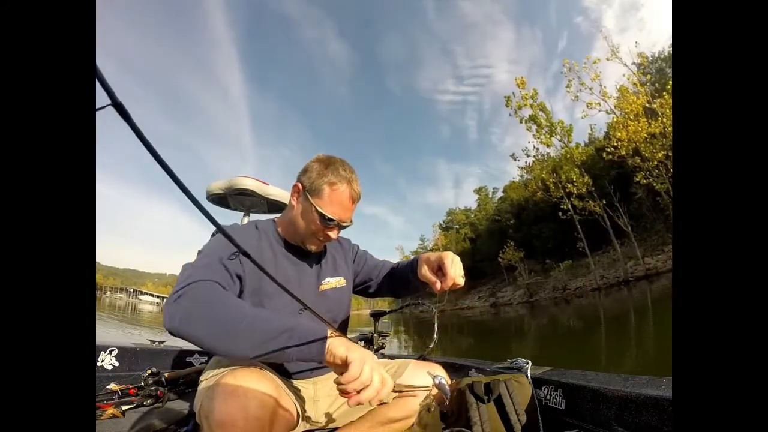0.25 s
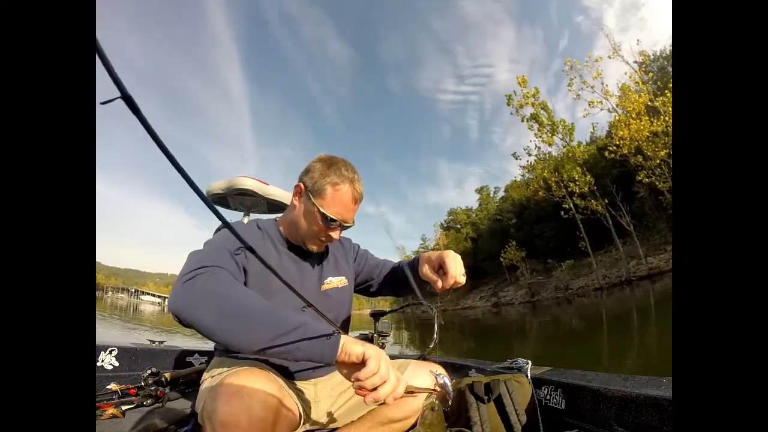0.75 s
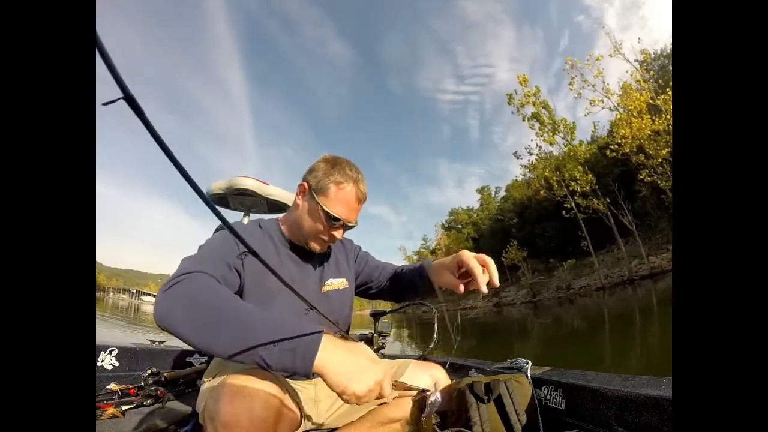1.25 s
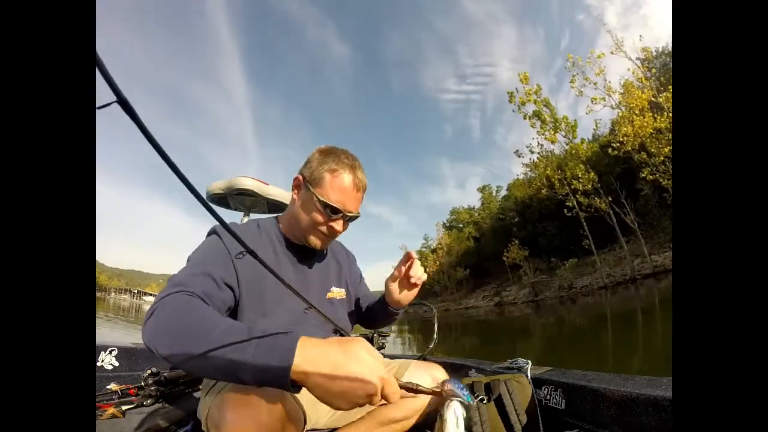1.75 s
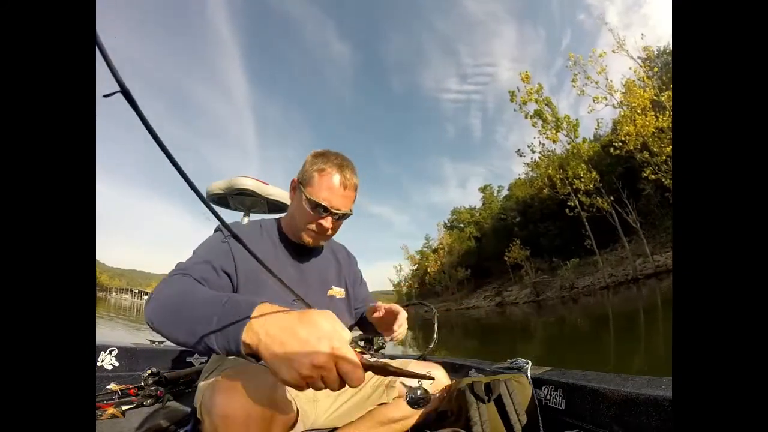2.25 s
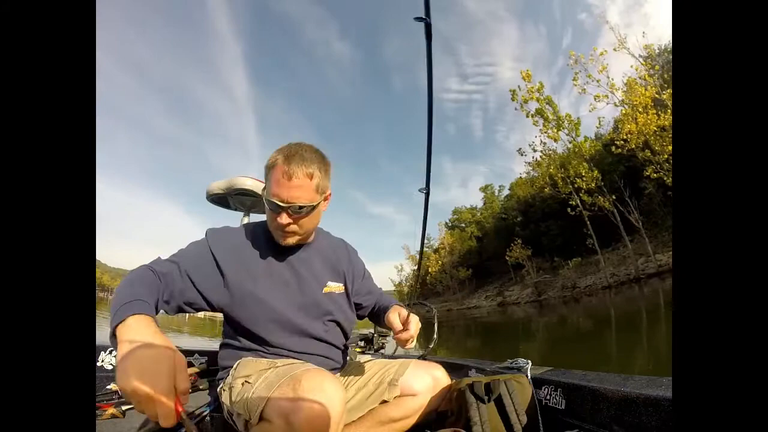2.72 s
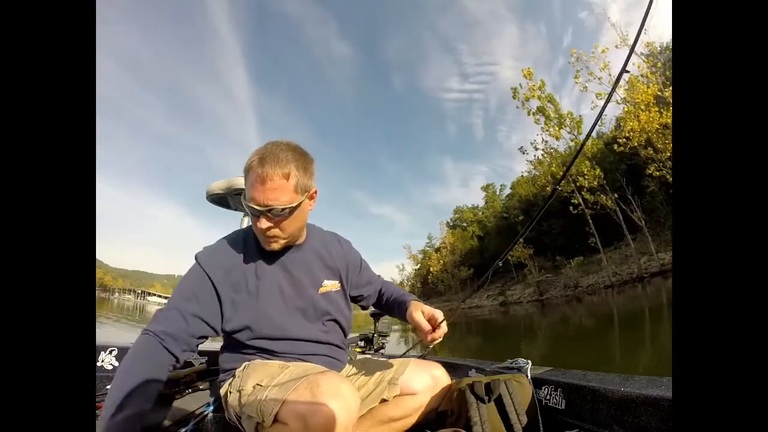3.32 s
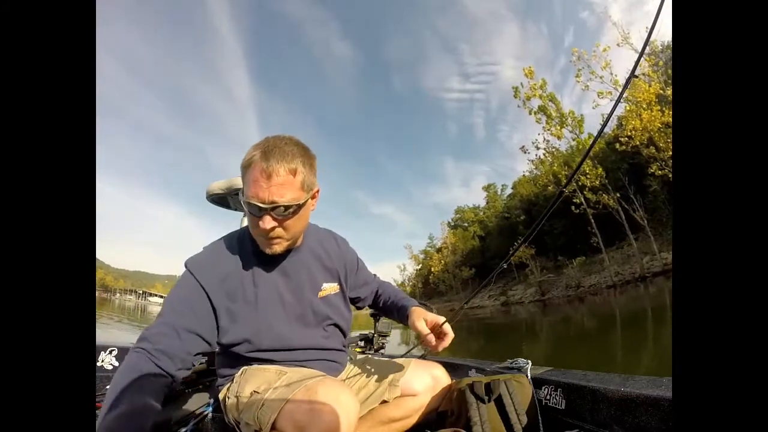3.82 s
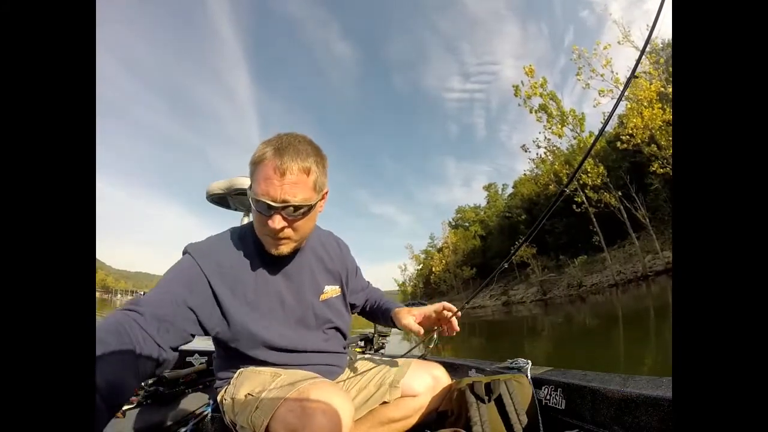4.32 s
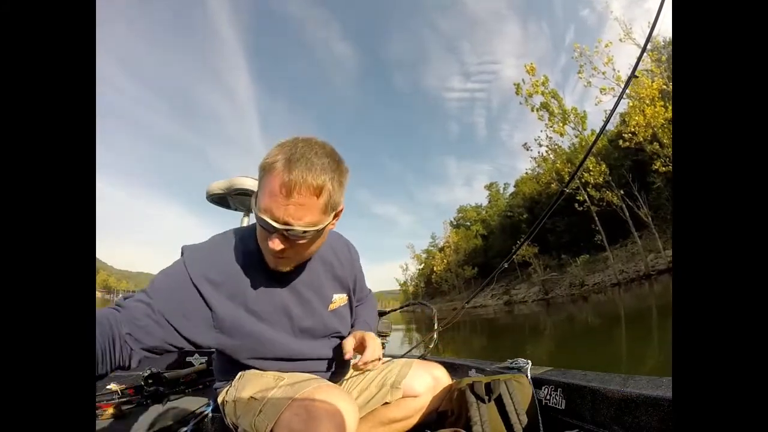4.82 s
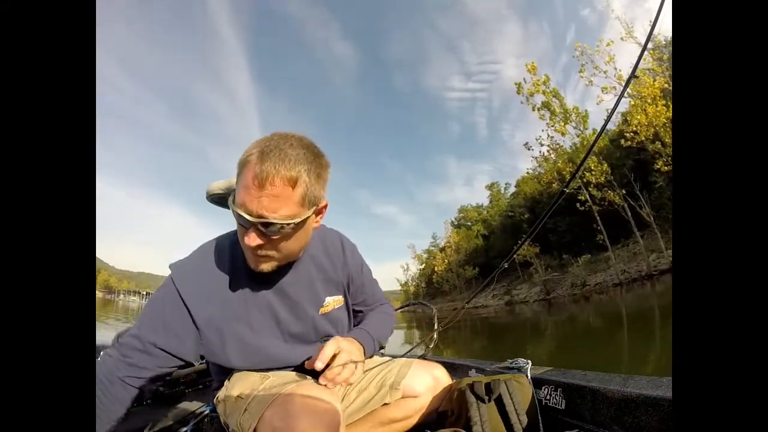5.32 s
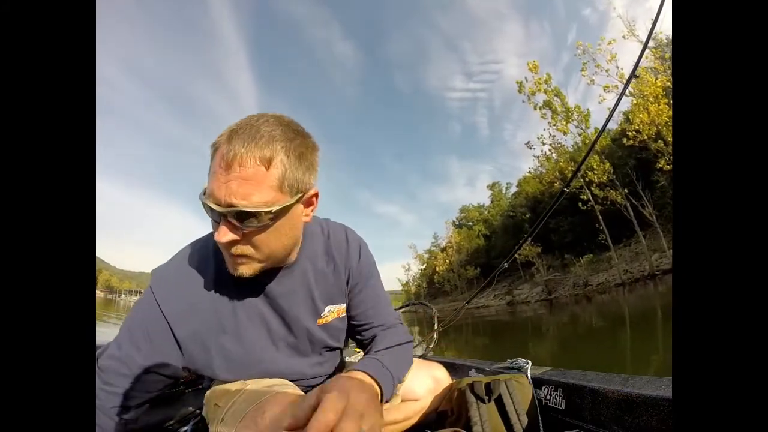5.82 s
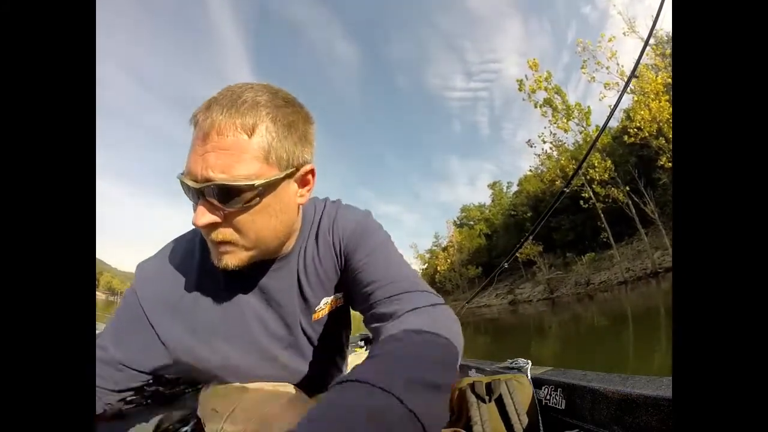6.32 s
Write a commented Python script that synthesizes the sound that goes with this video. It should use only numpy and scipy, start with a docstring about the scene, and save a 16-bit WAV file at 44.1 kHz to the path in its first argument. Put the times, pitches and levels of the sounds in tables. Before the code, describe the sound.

Irregular metal clinks, plastic clacks and hollow knocks as a hooked fish thrashes in a small boat on a quiet lake.

```python
"""Light wind and lake hush lie around a small swaying boat, where tackle ticks faintly. From 1.4 s a
hooked fish thrashes, rattling the lure's hooks and plastic body. Near 2.8 s steel pliers are dropped
among the tackle and jangle. Fish and gear thump the hollow deck, hardest at 4.7 s.
From 5.1 s a far bird whistles, before and after one last flurry."""
import sys
import numpy as np
from scipy import signal
from scipy.fft import rfft, irfft
from scipy.io import wavfile

SR = 44100
rng = np.random.default_rng(int(sys.argv[2]) if len(sys.argv) > 2 else 0)


def to_wav(sig):
    """Store sig (one row per channel, or 1-D mono) as 16-bit WAV at the path in sys.argv[1].

    Samples outside -1..1 are clipped; the rate is SR.
    """
    pcm = np.clip(np.atleast_2d(sig), -1, 1) * 32767
    pcm = np.round(pcm).astype(np.int16)
    wavfile.write(sys.argv[1], SR, pcm.T)  # frames by channels


N = 289560


def from_db(db):
    return 10 ** (np.asarray(db) / 20)


def rms_one(x):
    return x / np.sqrt(np.mean(x ** 2) + 1e-20)


def curves(rows):
    """Draws one automation curve for each column after the time."""
    times, *columns = np.transpose(rows)
    return [np.interp(np.arange(N) / SR, times, column) for column in columns]


def equalise(x, spectrum):
    """Shapes x with an EQ curve of (frequency [Hz], gain [dB]) points."""
    hz, db = np.transpose(spectrum)
    grid = np.maximum(np.arange(len(x) // 2 + 1) * SR / len(x), 1)
    return irfft(rfft(x) * from_db(np.interp(np.log(grid), np.log(hz), db)), len(x))


def drift(rate_hz):
    """Smooth random modulation at unit RMS."""
    pole = np.exp(-2 * np.pi * rate_hz / SR)
    return rms_one(signal.lfilter([1], [1, -2 * pole, pole * pole], rng.standard_normal(N + SR))[SR:])


def ring(force, hz, t60):
    """One mode: a unit click sets off a dying sine of height 1."""
    r, w = from_db(-60 / (t60 * SR)), 2 * np.pi * hz / SR
    return signal.lfilter([0, np.sin(w)], [1, -2 * r * np.cos(w), r * r], force + 1e-18)


def grains(per_s, spread_db):
    """Random tiny contacts of uneven size, at unit RMS."""
    when, size, sign = rng.random((round(per_s * N / SR), 3)).T
    size_db = spread_db * np.minimum(-np.log(1 - size), 4)
    out = np.zeros(N)
    out[(when * N).astype(int)] = from_db(size_db) * np.sign(sign - .5)
    return rms_one(out)


def add_hit(track, time, sound, peak_db):
    """Lays a one-shot on the track at the given peak level."""
    i = round(time * SR)
    track[i:i + len(sound)] += (from_db(peak_db) * sound / np.abs(sound).max())[:N - i]


# Tone of the lake bed: (frequency [Hz], relative level [dB])
LAKE_EQ = [(12, -35), (20, -18.5), (60, -1), (86, -0.5), (590, -10.5), (976, -14), (1150, -16.5),
           (1910, -23.5), (5530, -27.5), (13500, -41), (14900, -47), (16000, -67)]


def lake_hush(level_db=-55.5):
    """The lake is a steady bed of dark noise."""
    return from_db(level_db) * rms_one(equalise(rng.standard_normal(N), LAKE_EQ))


# Low swells of rumble as the hull sways: (time [s], level [dB])
HULL_SWAYS = [(1.55, -46.5), (2.23, -36), (2.43, -44), (3.1, -44.5), (3.69, -45), (4.19, -46), (4.4, -42.5),
              (4.73, -27), (5.01, -37), (5.85, -37), (6.21, -45)]


def hull_sway(rise_s=0.014, t60=0.53):
    """Envelope of the swaying hull: each sway rises and dies away, and overlaps add in power."""
    times, db = np.transpose(HULL_SWAYS)
    power = np.full(N, 1e-18)
    np.add.at(power, (times * SR).astype(int), from_db(2 * db))
    rise, fall = np.exp(-1 / (rise_s * SR)), from_db(-2 * 60 / (t60 * SR))
    return np.sqrt(signal.lfilter([1 - rise], np.poly([rise, fall]), power))


# Fader ride of the wind on the microphone: (time [s], level [dB])
WIND_RIDE = [(0, -56.5), (1.5, -58.5), (3.0, -55), (4.1, -54.5), (4.5, -51.5), (5.3, -60.5), (5.75, -50),
             (6.57, -58.5)]


def wind_and_hull():
    """Air over the microphone and the swaying hull share one lumpy low rumble."""
    band = signal.butter(2, [40, 130], "band", fs=SR, output="sos")
    rumble = signal.sosfilt(band, rng.standard_normal(N)) * from_db(2.9 * drift(3.5))
    return np.hypot(from_db(curves(WIND_RIDE)[0]), hull_sway()) * rms_one(rumble)


def whistle(contour, octave_db):
    """One bird note: a wavering sine and its octave, with soft ends."""
    hz, level_db = curves(contour)
    t = np.arange(N) / SR
    phase = 2 * np.pi * np.cumsum(hz * (1 + .004 * drift(42))) / SR
    gate = np.clip(np.minimum(t - contour[0][0], contour[-1][0] - t) / 0.017, 0, 1)
    tone = np.sin(phase) + from_db(octave_db) * np.sin(2 * phase)
    return np.sqrt(2) * gate * from_db(level_db + 3.4 * drift(36.8)) * tone


# Contour of the arching whistle: (time [s], pitch [Hz], level [dB])
ARCHING_CALL = [(6.04, 5500, -73), (6.09, 6000, -72), (6.15, 6010, -68), (6.19, 5830, -71),
                (6.25, 5600, -68), (6.305, 4600, -72)]
# Calls on one pitch: (time [s], length [s], pitch [Hz], crest level [dB])
FLAT_CALLS = [(5.15, .11, 3890, -70), (5.345, 0.026, 3820, -64), (6.42, .13, 4050, -74)]


def far_bird(crest_share=.35, fade_db=19):
    """A far bird gives one almost pure arching whistle and short flat calls that crest early."""
    out = whistle(ARCHING_CALL, octave_db=-40)
    for time, length, hz, db in FLAT_CALLS:
        crest, end = time + crest_share * length, time + length
        out += whistle([(time, hz, db - fade_db), (crest, hz, db), (end, hz, db - fade_db)], octave_db=-12)
    return out


# Faint stirring of the gear, resting floor included: (time [s], metal [dB], plastic [dB], deck [dB])
STIRRING = [(0, -67, -63, -60), (1.4, -67, -62, -57.5), (1.7, -52, -53.5, -52.5), (2.15, -50, -47.5, -47),
            (2.3, -64, -61.5, -56.5), (2.7, -57, -56, -50.5), (3.1, -66, -57.5, -49.5),
            (3.6, -67.5, -62, -59.5), (4.15, -70, -61.5, -55), (4.55, -64.5, -60.5, -51),
            (4.95, -68, -61, -48), (5.1, -70, -61, -55.5), (6.57, -69, -60, -62)]
# Bouts of shaking, sliding and tumbling:
# (start [s], end [s], metal [dB], plastic [dB], deck [dB], change by the end [dB])
THRASH_BOUTS = [(1.371, 1.42, -53.5, -60, -55, -5), (1.55, 1.588, -46, -45, -38.5, 6),
                (1.595, 1.614, -35, -52, -43, -10), (1.708, 1.791, -44, -47.5, -47, 1),
                (1.794, 1.845, -34, -34.5, -36.5, -7), (1.86, 1.96, -44, -55, -60, 3.5),
                (1.984, 2.12, -36, -46, -40.5, -8.5), (2.14, 2.198, -59, -57, -61, 11),
                (2.227, 2.287, -59, -38, -25, -10), (2.293, 2.482, -66.5, -58, -44.5, 1),
                (2.539, 2.605, -49.5, -73, -72, -7), (2.638, 2.703, -63, -49, -47, -10),
                (2.755, 2.788, -22.5, -26.5, -21, -8.5), (2.805, 2.889, -31.5, -28, -30.5, -18.5),
                (2.887, 2.945, -34.5, -26, -32, -10), (2.954, 3.062, -64, -56, -50.5, 5),
                (3.207, 3.221, -36, -41, -41, -5), (3.269, 3.298, -44.5, -50, -62, -5),
                (3.402, 3.498, -34, -44, -40, -17.5), (3.509, 3.61, -73, -65.5, -64.5, 11.5),
                (3.675, 3.795, -35, -41.5, -35.5, -18.5), (3.812, 3.9, -49, -59, -43, -16.5),
                (4.182, 4.232, -80, -63.5, -41, 3), (4.268, 4.291, -64, -48, -20.5, -31),
                (4.383, 4.495, -79, -67, -35.5, 6), (4.444, 4.53, -53, -65, -40.5, -7),
                (4.558, 4.644, -63.5, -54, -43, 10.5), (4.65, 4.69, -48.5, -45, -26.5, -1),
                (4.702, 4.721, -43, -33, -16.5, -16), (4.72, 4.864, -45.5, -39.5, -22.5, -16),
                (4.907, 4.929, -58.5, -49.5, -34, -3.5), (5.008, 5.064, -59, -62, -29.5, -33),
                (5.329, 5.389, -72, -58.5, -42.5, -2.5), (5.412, 5.47, -64, -46, -46.5, -3),
                (5.539, 5.609, -52, -31, -33.5, -19.5), (5.817, 5.85, -59, -58, -44.5, -1.5),
                (5.848, 5.886, -35, -41.5, -25.5, -8), (5.87, 6.023, -48, -64, -47.5, -14.5),
                (5.946, 5.994, -39, -34, -21, -35), (6.188, 6.224, -64.5, -52, -41.5, 0.5),
                (6.54, 6.6, -71, -50.5, -47, 7)]


def gear_motion(floors_db=(-67, -63, -59), attack_s=0.0083, release_s=0.014):
    """Envelopes of metal, plastic and deck: stirring above the floor and sudden bouts add in power."""
    t = np.arange(N) / SR
    power = np.maximum(from_db(curves(STIRRING)) ** 2 - from_db(floors_db)[:, None] ** 2, 0)
    for start, end, *levels_db, change_db in THRASH_BOUTS:
        gate = np.interp(t, [start, start + attack_s, end, end + release_s], [0, 1, 1, 0])
        ramp = from_db(change_db * np.clip((t - start) / (end - start), 0, 1))
        power += (from_db(levels_db)[:, None] * gate * ramp) ** 2
    return np.sqrt(power)


def jingle(modes, per_s, gain):
    """Small contacts feed metal modes whose ring outlasts the motion."""
    energy = sum(from_db(2 * db) * t60 * SR / (4 * np.log(1000)) for hz, db, t60 in modes)
    rings = sum(from_db(db) * ring(gain * grains(per_s, spread_db=5), hz, t60) for hz, db, t60 in modes)
    return rings / np.sqrt(energy)


# Ring of the hooks: (frequency [Hz], relative level [dB], decay t60 [s])
HOOK_MODES = [(4490, -5, .018), (5190, -8, .012), (5900, -4, .01), (7750, -2, .013), (8150, -1, .011),
              (9380, -7, .01), (10900, -9, .01), (11500, -7, .01), (13300, -6, .012)]
# Ring of the steel pliers: (frequency [Hz], relative level [dB], decay t60 [s])
PLIER_MODES = [(5250, -7, .02), (5370, -6, .035), (5550, -8, .02), (6585, -4, .05), (8086, -11, .03),
               (10290, -3, .036), (10385, -5, .02), (11380, -6, .018), (11520, -5, .032), (14780, -7, .035)]
# Bright crack of metal on metal: (frequency [Hz], relative level [dB])
CRACK_EQ = [(1500, -11), (4000, -6), (7000, -3.5), (11000, -4.5), (15000, -6)]


def metal_rattle(gain, plier_share):
    """Dense small metal contacts: a crackle with the ring of hooks and pliers."""
    crackle = grains(per_s=7000, spread_db=4.3) * from_db(4 * drift(70))
    cracks = rms_one(equalise(crackle, CRACK_EQ))
    hooks = jingle(HOOK_MODES, per_s=450, gain=gain * (1 - plier_share))
    pliers = jingle(PLIER_MODES, per_s=77, gain=gain * plier_share)
    return gain * cracks + from_db(-1.5) * hooks + from_db(4) * pliers


# Metal one-shots: (time [s], peak before muffling [dB], chatter t60 [s], ring against crack [dB])
CLINK_CUES = [(0.0293, -40.5, 0.03, -28), (0.07, -48, 0.02, 2), (0.082, -49, 0.02, -3),
              (0.181, -53, 0.02, 0), (0.33, -53, 0.02, 0), (0.5885, -48, 0.058, 2), (0.881, -54, 0.02, -10),
              (1.08, -55, 0.02, -10), (1.19, -50, 0.024, -6), (1.282, -47, 0.025, -3),
              (1.379, -46, 0.017, 2), (1.4104, -30.5, 0.039, -28), (1.482, -30, 0.038, -31),
              (1.508, -35, 0.061, -5), (1.559, -41, 0.03, -9), (1.5802, -17.5, 0.028, -15),
              (1.608, -27, 0.03, -12), (1.6568, -33.5, 0.076, -15), (1.6835, -22, 0.014, -9),
              (1.723, -14, 0.019, -11), (1.8043, -36, 0.053, 0), (1.873, -26, 0.025, -27),
              (1.9111, -36, 0.033, -2), (1.93, -22, 0.035, 17), (2.0062, -18, 0.035, -35),
              (2.045, -14, 0.024, -9), (2.0868, -23.5, 0.053, -33), (2.137, -23, 0.012, -10),
              (2.158, -43, 0.024, -1), (2.175, -28.5, 0.025, -5), (2.2262, -31.5, 0.12, -12),
              (2.314, -38, 0.064, 9), (2.3302, -33.5, 0.052, -12), (2.374, -36, 0.025, -14),
              (2.394, -36, 0.025, -12), (2.415, -34.5, 0.021, -21), (2.458, -38, 0.012, -25),
              (2.514, -39, 0.034, -6), (2.548, -32, 0.033, -28), (2.583, -36, 0.062, -11),
              (2.6, -31, 0.031, -5), (2.6437, -21.5, 0.034, -16), (2.676, -31, 0.018, -8),
              (2.6967, -31, 0.092, -2), (2.7385, -24.5, 0.037, -26), (2.7676, -3, 0.014, 6),
              (2.805, -9, 0.011, 0), (2.8464, -19, 0.093, 16), (2.8914, -15, 0.023, -9),
              (2.911, -13, 0.015, -15), (2.97, -29, 0.033, -10), (3.013, -29.5, 0.028, 3),
              (3.1378, -43, 0.027, -13), (3.1763, -36.5, 0.023, -28), (3.215, -24.5, 0.063, 29),
              (3.257, -35, 0.051, -15), (3.2819, -34, 0.015, -9), (3.3985, -21.5, 0.03, -10),
              (3.423, -7, 0.023, 4), (3.5452, -34, 0.045, -8), (3.598, -37, 0.02, -7),
              (3.6287, -42, 0.03, -24), (3.6781, -20.5, 0.03, 1), (3.7294, -20, 0.064, 29),
              (3.8184, -26.5, 0.03, -2), (3.8897, -37, 0.025, -22), (3.999, -46, 0.04, -7.5),
              (4.035, -55, 0.018, -9), (4.217, -34, 0.016, -11), (4.2678, -33, 0.031, -19),
              (4.3884, -43, 0.039, -11), (4.403, -45, 0.02, -8), (4.4502, -27, 0.074, -6),
              (4.493, -34, 0.063, 6), (4.5291, -35, 0.04, -9), (4.6102, -25.5, 0.02, -14),
              (4.6216, -24, 0.033, -13), (4.64, -26, 0.018, -10), (4.678, -24, 0.022, -16),
              (4.6928, -19, 0.047, -31), (4.717, -17.5, 0.025, -31), (4.765, -19.5, 0.0065, -26),
              (4.7922, -21, 0.013, -21), (4.826, -36, 0.016, -7), (4.817, -37, 0.015, -11),
              (4.837, -29, 0.015, -22), (4.849, -35, 0.011, -13), (4.9218, -39, 0.044, -14),
              (5.13, -47.5, 0.06, -24), (5.3, -48, 0.017, -10), (5.388, -37, 0.028, -1),
              (5.409, -22.5, 0.027, -11), (5.545, -23.5, 0.057, 10), (5.586, -38, 0.027, -3),
              (5.664, -39, 0.023, -8), (5.827, -37, 0.031, -20.5), (5.848, -15, 0.046, -17),
              (5.915, -25.5, 0.038, 9), (5.942, -19, 0.017, -6), (6.0023, -45, 0.022, -8.5),
              (6.0946, -41.5, 0.038, -26), (6.2136, -39, 0.018, -7)]


def metal_clinks(plier_share):
    """Each clink is a dying chatter of contacts, heard as a crack and ringing hooks or pliers."""
    out, t = np.zeros(N), np.arange(round(.12 * SR)) / SR
    modes = HOOK_MODES + PLIER_MODES
    noises = rng.standard_normal((len(CLINK_CUES), len(t)))
    scatters_db = 6.5 * np.clip(rng.standard_normal((len(CLINK_CUES), len(modes))), -1, 1)
    attack = 1 - np.exp(-t / 0.0004)
    for (time, peak_db, t60, ring_db), noise, scatter_db in zip(CLINK_CUES, noises, scatters_db):
        chatter = noise * attack * from_db(-60 * t / t60)
        share = plier_share[round(time * SR)]
        weights = [1 - share] * len(HOOK_MODES) + [share] * len(PLIER_MODES)
        rings = sum(weight * from_db(db + offset_db) * ring(chatter, hz, mode_t60)
                    for (hz, db, mode_t60), weight, offset_db in zip(modes, weights, scatter_db))
        crack = rms_one(equalise(chatter, CRACK_EQ))
        add_hit(out, time, crack + from_db(ring_db) * rms_one(rings), peak_db)
    return out


# Crossfade and brightness of the metal: (time [s], pliers against hooks [0-1], top band gain [dB])
METAL_BLEND = [(0, 0, 0), (1.4, 0.15, -4.5), (2.72, 0.1, -7), (2.78, 0.46, -26), (3.1, 1, -12.5),
               (3.95, 1, 0.5), (4.4, 0.7, -7), (4.55, 1, 2), (4.6, 0.14, -20), (5.7, 0.1, -21.5),
               (5.85, 0.63, -4), (6.57, 0.4, -7)]


def hooks_and_pliers(gain, crossover_hz=11500):
    """The metal clinks and rattles while hand and gear muffle its highest treble."""
    plier_share, top_db = curves(METAL_BLEND)
    metal = metal_clinks(plier_share) + metal_rattle(gain, plier_share)
    low, high = (signal.butter(2, crossover_hz, kind, fs=SR, output="sos") for kind in ("low", "high"))
    body = signal.sosfilt(np.vstack([low, low]), metal)
    top = signal.sosfilt(np.vstack([high, high]), metal)
    return body + from_db(top_db) * top


def contact_centre(cues):
    """The place being touched moves from blow to blow, heard as a gliding centre in Hz."""
    return curves(sorted((time, hz) for time, _, hz, _ in cues))[0]


def scuffle(modes, centre_hz, per_s, t60_cycles, octaves):
    """Rubbing and small bumps feed short rings of a body, strongest near the centre frequency."""
    lumps = from_db(2.5 * drift(30))
    weights = [from_db(db - 2.07 * (np.log2(hz / centre_hz) / octaves) ** 2) for hz, db in modes]
    rings = [rms_one(ring(grains(per_s, spread_db=5.03) * lumps, hz, t60_cycles / hz)) for hz, _ in modes]
    return sum(w * r for w, r in zip(weights, rings)) / np.sqrt(sum(w ** 2 for w in weights))


def blows(cues, modes, octaves, roughness, contact_cycles):
    """Each blow wakes the modes near its centre; a scuffed contact keeps feeding them briefly."""
    out, t = np.zeros(N), np.arange(round(.15 * SR)) / SR
    noises = rng.standard_normal((len(cues), len(t)))
    scatters_db = 3.6 * rng.standard_normal((len(cues), len(modes)))
    for (time, peak_db, centre_hz, t60), noise, scatter_db in zip(cues, noises, scatters_db):
        force = roughness * noise * np.exp(-t * centre_hz / contact_cycles) / np.sqrt(SR / centre_hz)
        force[round(.0022 * SR)] += 1   # a sharp click 2 ms into the scuff gives the knock its attack
        soft_contact = signal.butter(1, 5.1 * centre_hz, fs=SR, output="sos")
        force = signal.sosfilt(soft_contact, force)
        body = 0
        for (hz, db), offset_db in zip(modes, scatter_db):
            off_centre_db = -3.6 * (np.log2(hz / centre_hz) / octaves) ** 2
            mode_t60 = max(t60, .008) * (centre_hz / hz) ** 0.6
            body += from_db(db + off_centre_db + offset_db) * ring(force, hz, mode_t60)
        # a small body radiates little far below the struck modes
        low_cut = signal.butter(2, 0.39 * centre_hz, "high", fs=SR, output="sos")
        add_hit(out, time, signal.sosfilt(low_cut, body), peak_db)
    return out


# Resonances of the hard plastic: (frequency [Hz], relative level [dB])
PLASTIC_MODES = [(1330, 1.5), (1645, -0.5), (1851, 3.5), (2230, 1.5), (2570, 0), (2880, -0.5), (3032, 1.5),
                 (3280, -3.5), (3880, -5)]
# Plastic one-shots: (time [s], peak [dB], centre of the struck modes [Hz], decay t60 [s])
CLACK_CUES = [(0.5873, -36, 3170, 0.017), (1.2835, -39.5, 3060, 0.011), (1.4064, -36, 1840, 0.016),
              (1.561, -24.5, 1640, 0.046), (1.5772, -23, 2360, 0.012), (1.6045, -22.5, 2390, 0.0091),
              (1.6825, -24, 3400, 0.024), (1.724, -14, 2980, 0.029), (1.803, -24, 3020, 0.048),
              (1.8834, -29.5, 2290, 0.022), (2.0042, -21, 2200, 0.018), (2.0318, -22.5, 1300, 0.0068),
              (2.106, -22, 2780, 0.0077), (2.2348, -18.5, 1250, 0.0061), (2.3394, -32.5, 2770, 0.018),
              (2.5227, -31.5, 2740, 0.022), (2.6459, -17, 3400, 0.034), (2.7008, -29.5, 2150, 0.026),
              (2.7585, -12.5, 1836, 0.033), (2.7691, -2.5, 2920, 0.022), (2.7696, -2.5, 1700, 0.014),
              (2.805, -13, 1780, 0.047), (2.847, -20, 1970, 0.014), (2.8923, -25, 2210, 0.018),
              (2.9098, -18.5, 2720, 0.07), (2.97, -26.5, 3030, 0.03), (3.1526, -29.5, 2580, 0.0084),
              (3.4054, -29, 1530, 0.034), (3.4194, -18, 1660, 0.016), (3.5836, -30.5, 1640, 0.012),
              (3.6778, -14, 2080, 0.029), (3.723, -21.5, 1850, 0.03), (3.8178, -22, 1830, 0.022),
              (4.2172, -27, 1480, 0.0076), (4.2669, -15.5, 1470, 0.0082), (4.3845, -22, 1750, 0.039),
              (4.44, -32, 1760, 0.07), (4.4682, -18.5, 1940, 0.028), (4.5308, -26.5, 1960, 0.017),
              (4.6562, -23, 1490, 0.09), (4.6672, -17, 1280, 0.027), (4.6932, -11, 1810, 0.038),
              (4.7372, -24, 1320, 0.014), (4.8326, -31.5, 1230, 0.061), (4.922, -31.5, 1480, 0.021),
              (5.012, -23.5, 1390, 0.015), (5.3843, -36.5, 1990, 0.018), (5.4066, -26.5, 2020, 0.024),
              (5.5476, -22, 1940, 0.058), (5.666, -38, 2170, 0.051), (5.8498, -24.5, 1840, 0.034),
              (5.9396, -15.5, 1810, 0.024), (6.2106, -30.5, 1650, 0.015)]


def plastic_lure(gain):
    """The lure's hard body clacks when struck and scuffles as it is shaken."""
    clacks = blows(CLACK_CUES, PLASTIC_MODES, octaves=0.24, roughness=0.088, contact_cycles=3.8)
    rubbing = scuffle(PLASTIC_MODES, contact_centre(CLACK_CUES), per_s=500, t60_cycles=26, octaves=.8)
    return clacks + gain * rubbing


# Resonances of the hollow deck: (frequency [Hz], relative level [dB])
DECK_MODES = [(80, -14), (125, -11.5), (155, -4), (208, -2.5), (260, -1.5), (330, -4.5), (383, -1),
              (476, 2.5), (603, 1.5), (725, 4), (880, 4.5), (1066, 2.5)]
# Deck one-shots: (time [s], peak [dB], centre of the struck modes [Hz], decay t60 [s])
THUMP_CUES = [(1.551, -28.5, 670, 0.032), (1.719, -34, 726, 0.15), (1.797, -39, 646, 0.034),
              (1.876, -30.5, 656, 0.026), (1.939, -31.5, 770, 0.019), (2.029, -37, 1040, 0.15),
              (2.17, -40, 655, 0.14), (2.232, -28, 175, 0.053), (2.396, -34, 348, 0.084),
              (2.428, -22, 570, 0.0086), (2.594, -46.5, 635, 0.06), (2.638, -37, 535, 0.038),
              (2.695, -34, 1000, 0.039), (2.761, -22.5, 406, 0.12), (2.872, -30.5, 594, 0.11),
              (2.915, -23.5, 880, 0.09), (3.02, -39, 870, 0.18), (3.163, -26.5, 800, 0.029),
              (3.212, -34, 500, 0.029), (3.278, -33, 660, 0.037), (3.419, -24.5, 451, 0.03),
              (3.677, -43, 263, 0.092), (3.759, -32, 705, 0.045), (3.816, -40, 266, 0.052),
              (3.888, -38.5, 162, 0.13), (4.187, -34, 124, 0.043), (4.216, -32.5, 390, 0.059),
              (4.265, -13.5, 394, 0.038), (4.385, -13.5, 578, 0.038), (4.447, -29, 650, 0.078),
              (4.469, -8.5, 663, 0.038), (4.597, -32.5, 198, 0.067), (4.693, 2.5, 673, 0.04),
              (4.73, -4.5, 282, 0.028), (4.917, -34, 145, 0.024), (5.01, -20.5, 576, 0.041),
              (5.327, -26, 450, 0.061), (5.389, -36, 121, 0.057), (5.527, -34.5, 606, 0.028),
              (5.535, -16, 336, 0.082), (5.853, -25, 917, 0.088), (5.854, -21.5, 165, 0.062),
              (5.868, -21, 815, 0.05), (5.953, -26, 910, 0.064), (6.075, -30.5, 738, 0.031),
              (6.211, -34.5, 268, 0.082)]


def hollow_deck(gain, rest_hz=214.7, takeover_db=-53.5):
    """Fish and gear thump and rub the deck; firm motion pulls its murmur toward the struck modes."""
    thumps = blows(THUMP_CUES, DECK_MODES, octaves=0.17, roughness=0.47, contact_cycles=5.9)
    touch = gain ** 2 / (gain ** 2 + from_db(2 * takeover_db))
    centre_hz = rest_hz * (contact_centre(THUMP_CUES) / rest_hz) ** touch
    rubbing = scuffle(DECK_MODES[1:], centre_hz, per_s=200, t60_cycles=16, octaves=.7)
    return thumps + gain * rubbing


def scene():
    """Mono mix of deck, lure and metal over the lake ambience."""
    metal_gain, plastic_gain, deck_gain = gear_motion()
    action = hollow_deck(deck_gain) + plastic_lure(plastic_gain) + hooks_and_pliers(metal_gain)
    ambience = lake_hush() + wind_and_hull() + far_bird()
    return (action + ambience)[None]


def record(dry, headroom=1.05, mic_top_hz=15300, cutoff_hz=16480):
    """Soft clipping rounds the peaks; the microphone rolls off the very top, then comes a steep cut."""
    rounded = headroom * np.tanh(dry / headroom)
    rolled_off = signal.sosfilt(signal.butter(10, mic_top_hz, fs=SR, output="sos"), rounded)
    return signal.sosfilt(signal.cheby2(12, 60, cutoff_hz, fs=SR, output="sos"), rolled_off)


dry = scene()
out = record(dry)
to_wav(out)
```